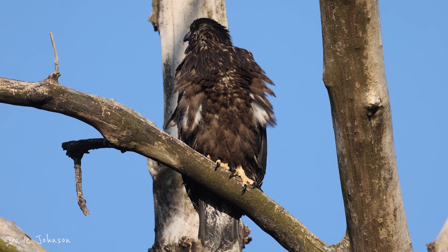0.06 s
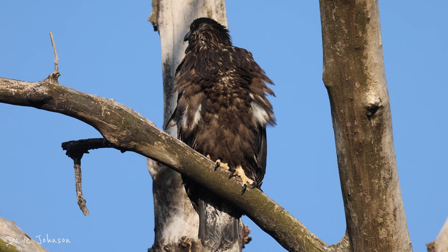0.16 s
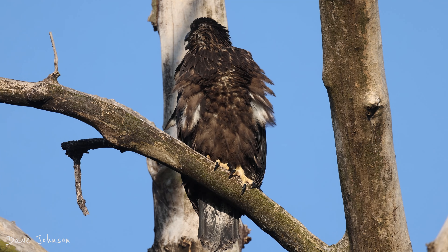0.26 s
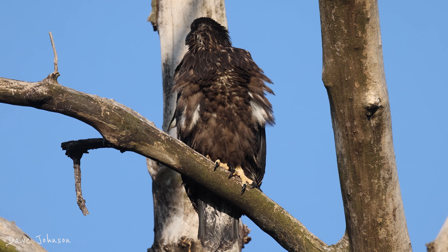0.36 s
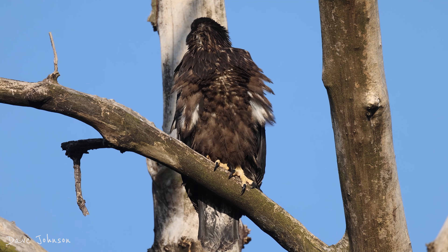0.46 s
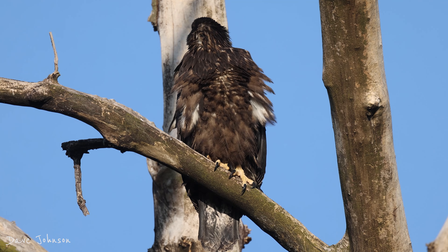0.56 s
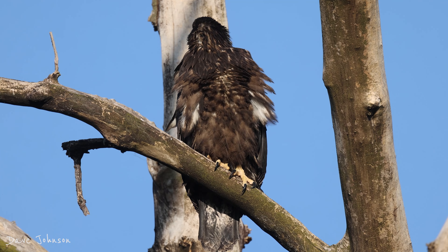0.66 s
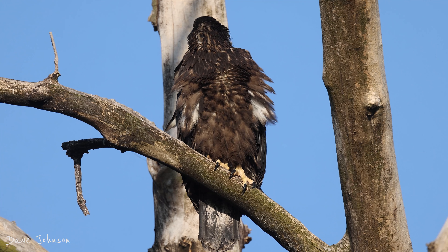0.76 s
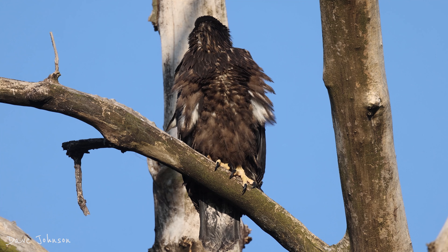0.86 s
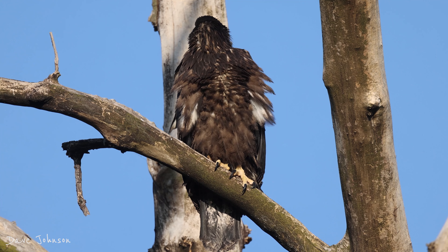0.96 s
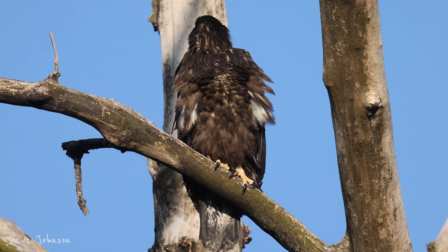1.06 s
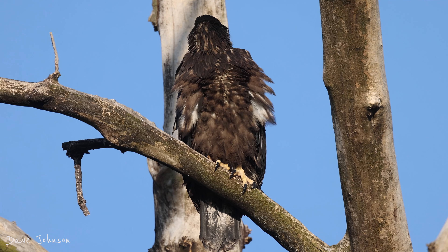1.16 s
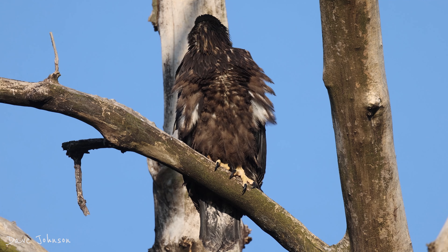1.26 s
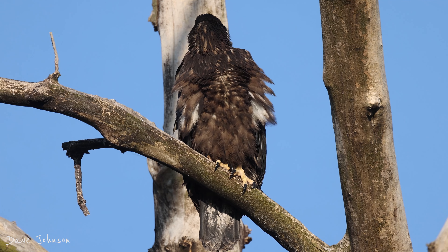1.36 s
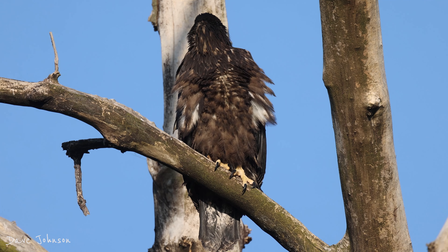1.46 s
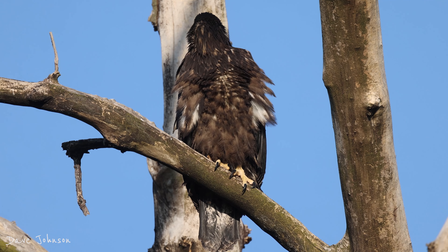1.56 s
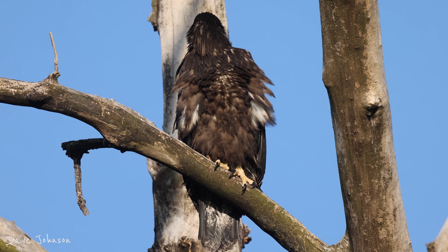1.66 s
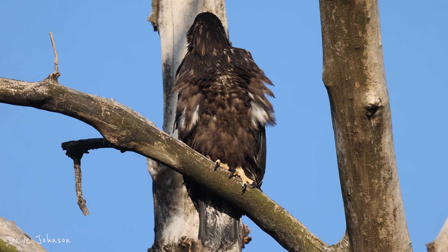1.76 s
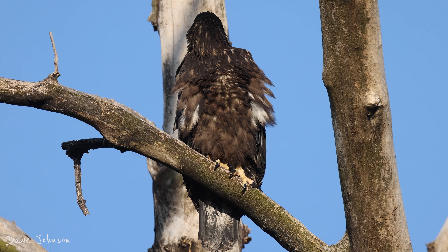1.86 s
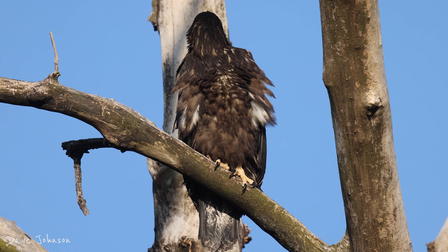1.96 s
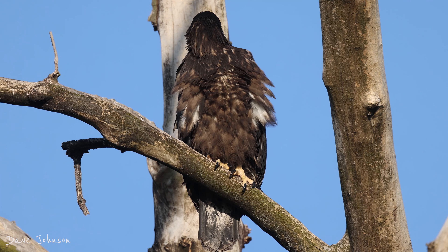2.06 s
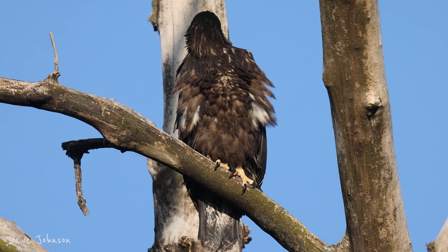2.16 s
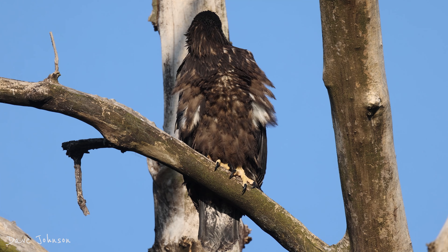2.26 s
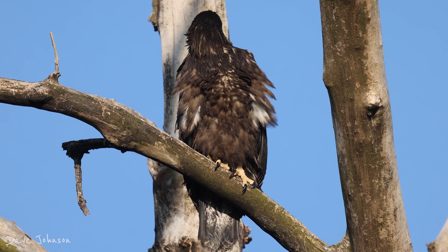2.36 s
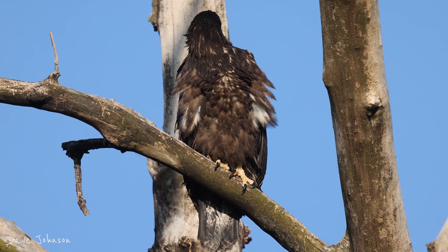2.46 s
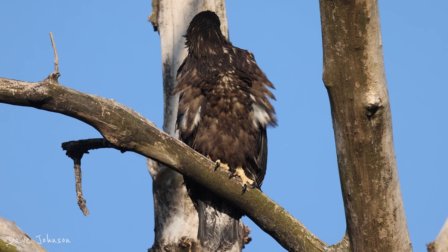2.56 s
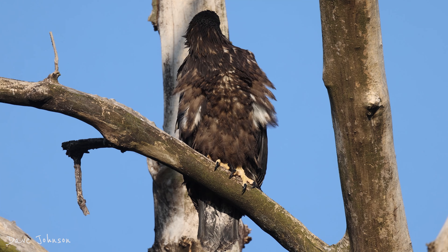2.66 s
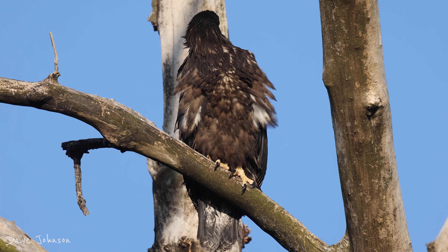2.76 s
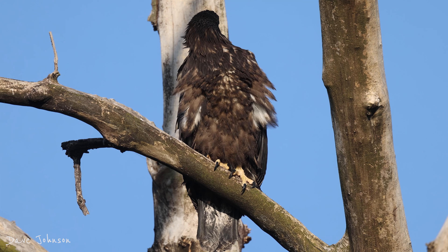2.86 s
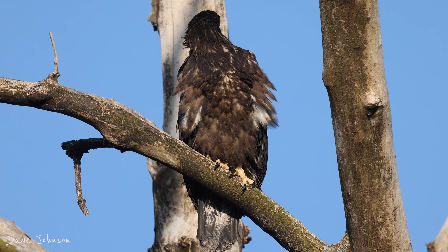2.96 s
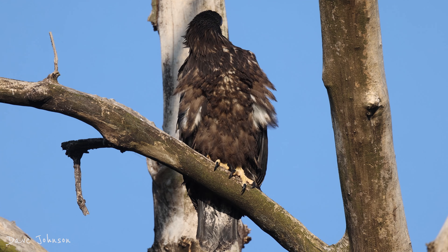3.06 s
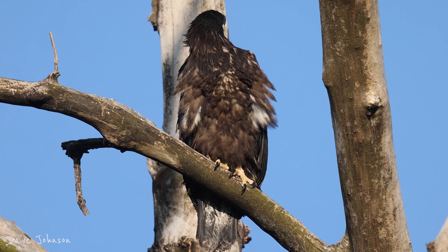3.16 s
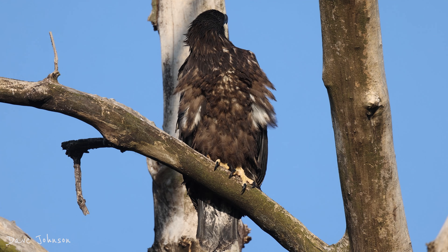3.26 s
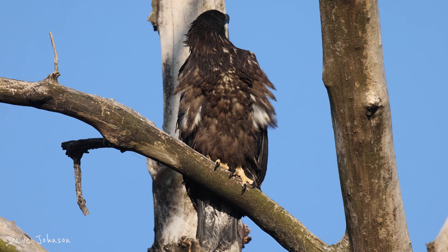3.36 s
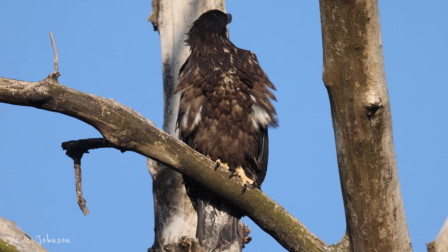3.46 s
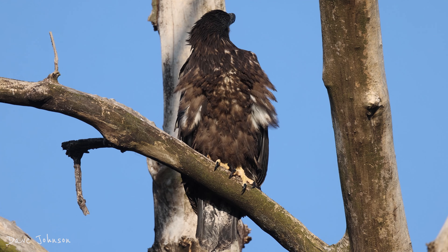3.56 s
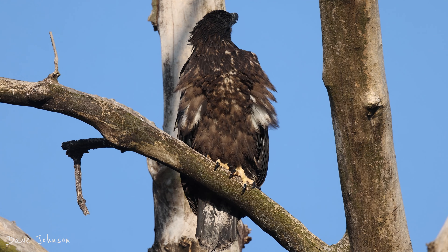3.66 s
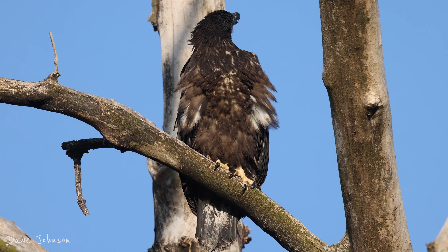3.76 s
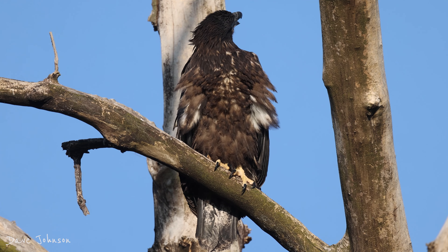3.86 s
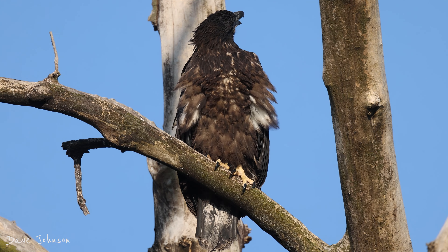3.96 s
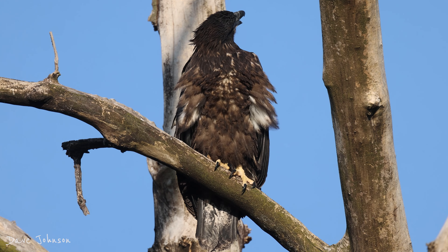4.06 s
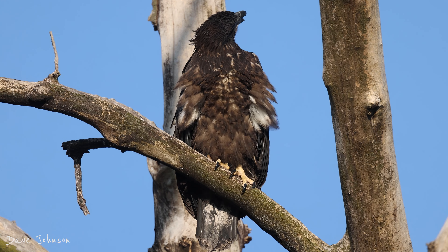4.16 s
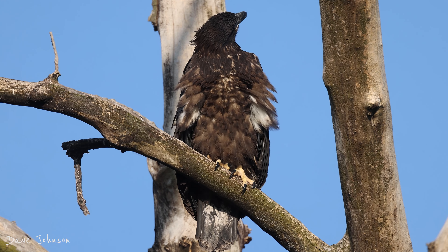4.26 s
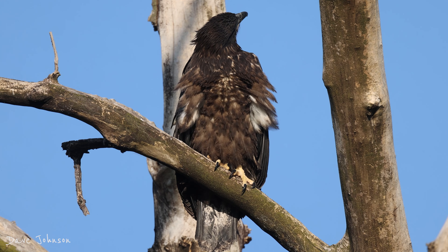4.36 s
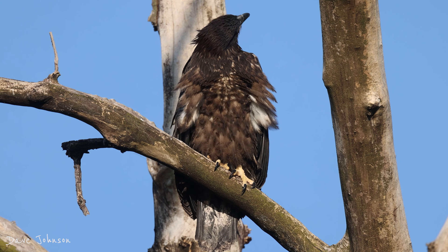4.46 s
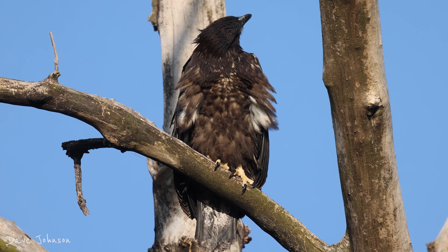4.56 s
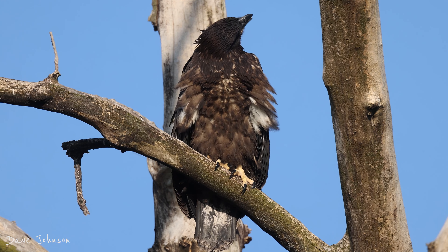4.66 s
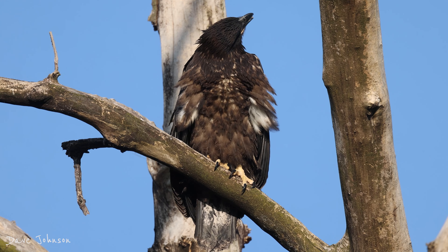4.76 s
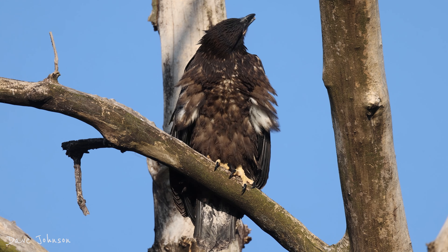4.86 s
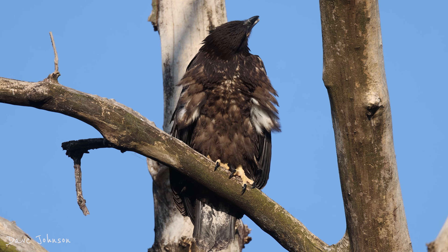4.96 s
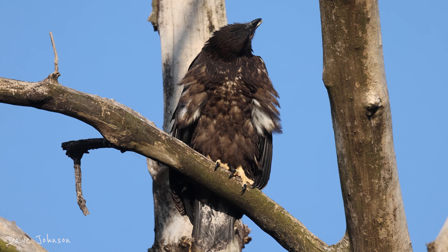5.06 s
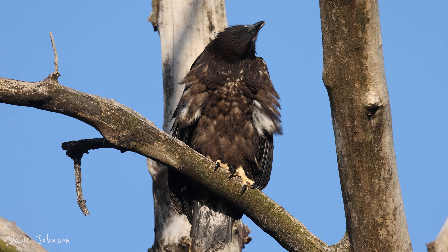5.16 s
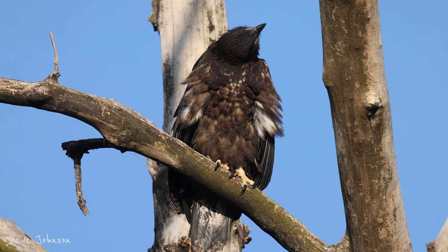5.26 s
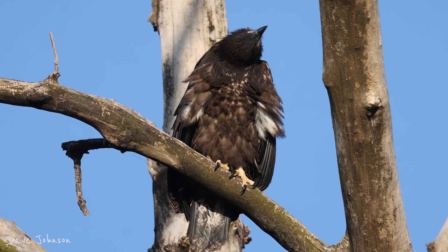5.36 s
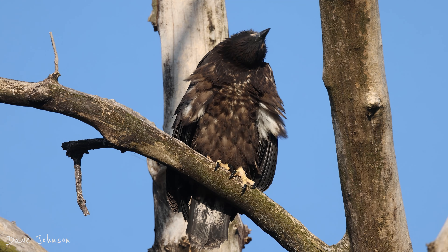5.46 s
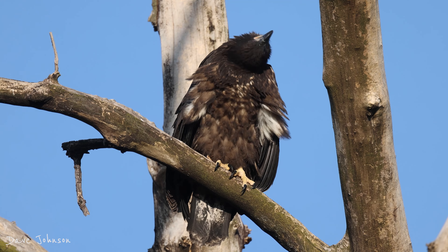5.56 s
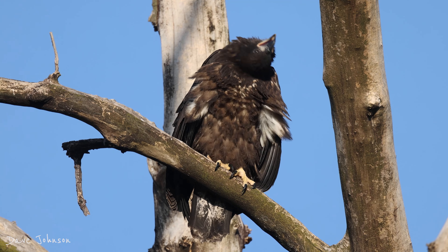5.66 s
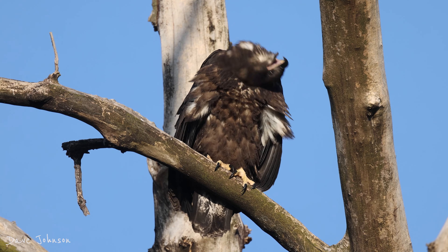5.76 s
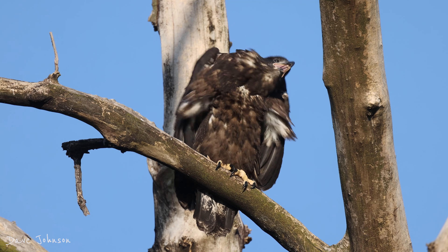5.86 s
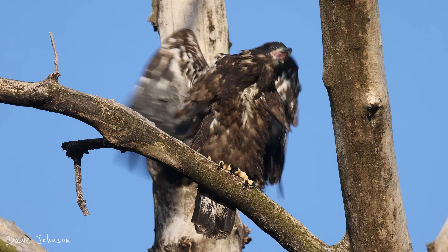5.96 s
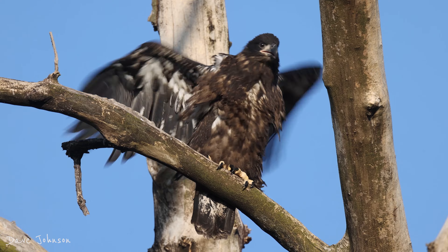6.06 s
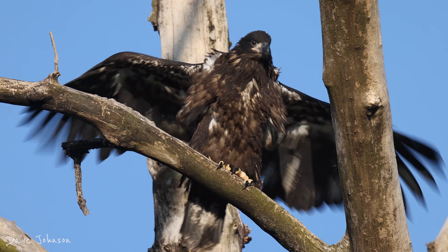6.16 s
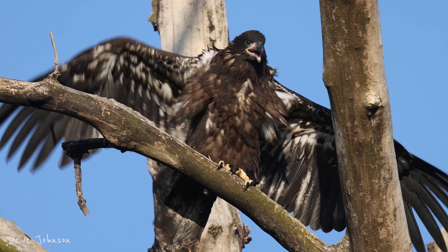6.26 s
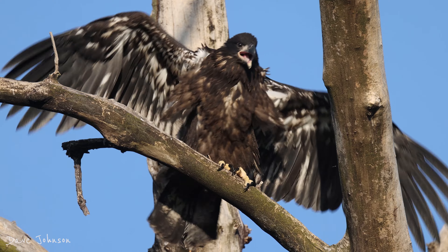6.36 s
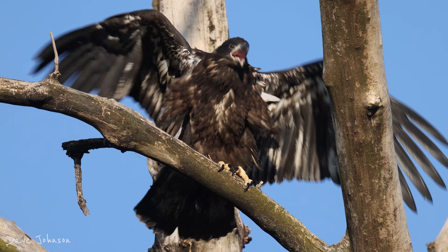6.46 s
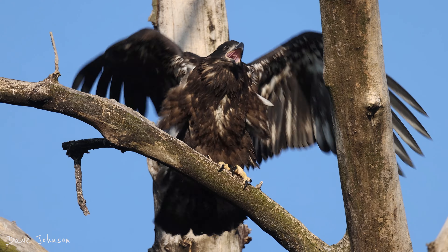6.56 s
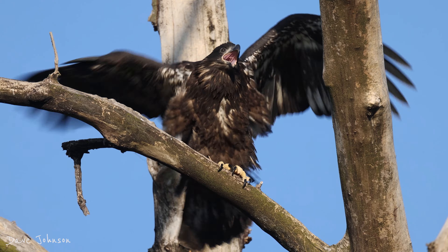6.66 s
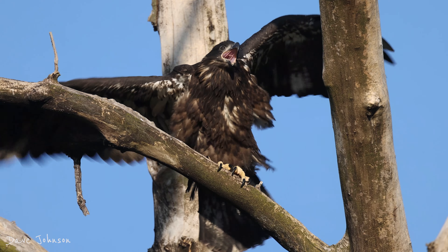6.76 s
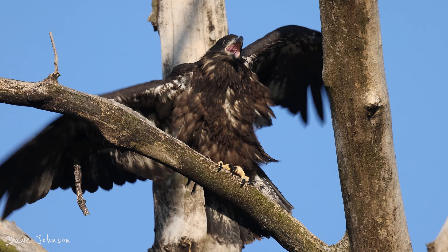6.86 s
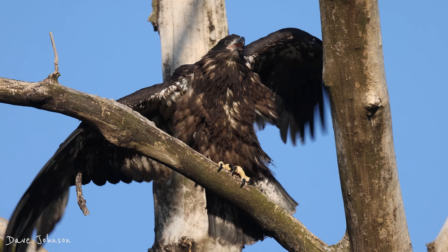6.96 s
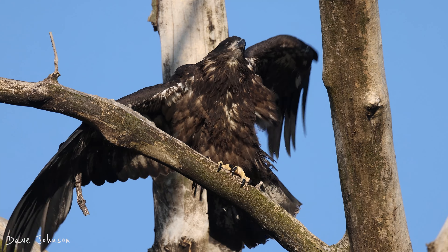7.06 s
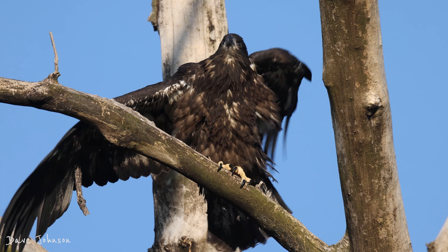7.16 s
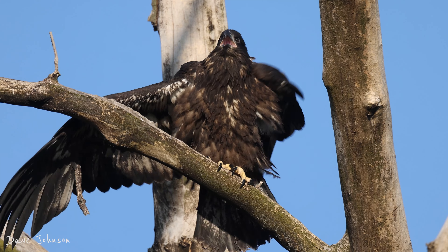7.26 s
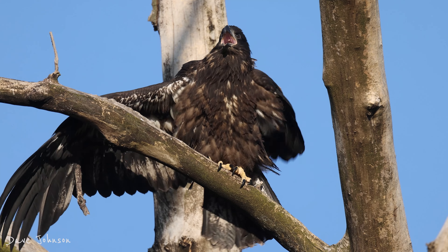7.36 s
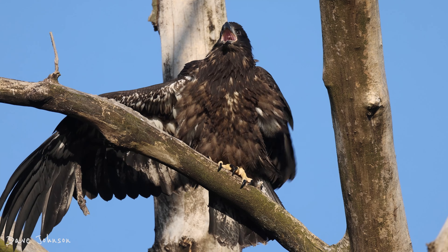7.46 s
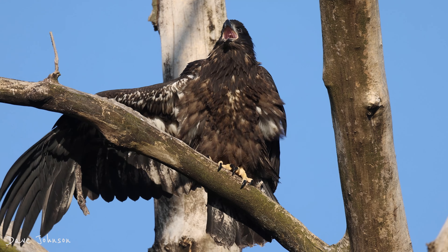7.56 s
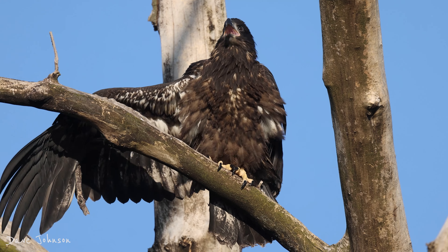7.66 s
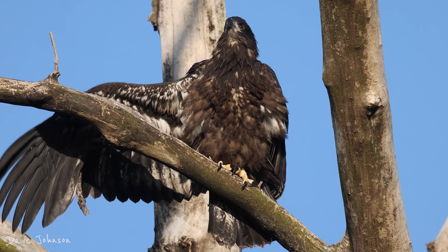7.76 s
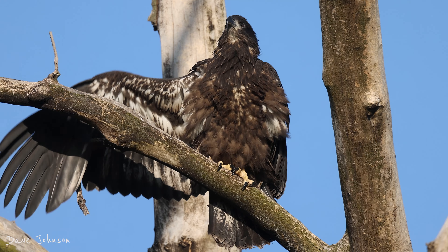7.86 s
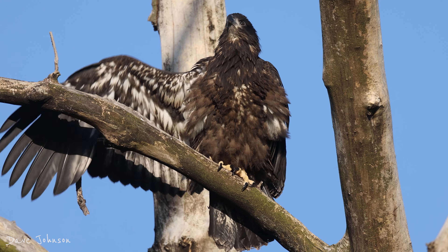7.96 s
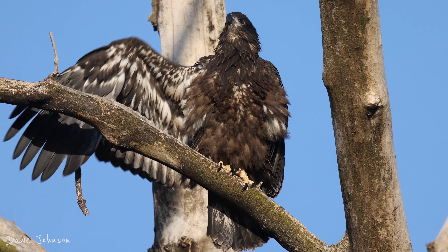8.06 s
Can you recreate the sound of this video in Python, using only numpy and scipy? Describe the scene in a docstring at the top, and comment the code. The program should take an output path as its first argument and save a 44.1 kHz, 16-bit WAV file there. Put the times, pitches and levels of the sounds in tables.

```python
"""A young eagle in a bare tree whistles five rising calls, later ones hoarse and with two voices at once:
two near-sine voices, their mixing tones, rasp strands and hiss. A blackbird chucks close by in clicks,
snaps, buzzes and squeaks. Low clucks are damped partials; far songbirds are gliding sines and throbbing
noise bands. Echoes off the trunks, blurred birdsong, air, wind and a distant hum (shaped noise) lie under it."""
import sys
import numpy as np
from scipy import signal
from scipy.io import wavfile
from scipy.ndimage import uniform_filter1d

SR = 44100
rng = np.random.default_rng(int(sys.argv[2]) if len(sys.argv) > 2 else 0)


def pcm_store(signal):
    """Save signal as 16-bit PCM."""
    levels = np.round(np.clip(np.atleast_2d(signal), -1, 1) * 32767)
    wavfile.write(sys.argv[1], SR, levels.astype(np.int16).T)


N = 357651

# eagle's first voice, one table per stretch between pitch jumps: (time [s], pitch [Hz], level [dB])
FIRST_VOICE = [
    [(3.9, 3280, -61), (4.03, 3294, -48), (4.06, 3340, -37.5), (4.124, 3420, -38.5)],
    [(4.126, 3900, -40.5), (4.22, 3700, -45), (4.27, 3776, -29), (4.36, 3794, -32.5)],
    [(4.82, 2790, -40), (4.85, 2595, -34.5), (4.914, 2727, -32)],
    [(4.916, 3190, -39), (4.97, 3162, -31), (5.038, 3182, -23.5), (5.1, 3203, -26), (5.13, 3243, -28.5),
     (5.19, 3310, -21), (5.21, 3340, -20), (5.218, 3460, -22), (5.254, 3537, -27), (5.278, 3627, -24.5),
     (5.298, 3601, -27), (5.32, 3724, -22), (5.346, 3716, -22)],
    [(5.803, 2790, -25), (5.848, 2822, -26), (5.865, 2880, -23.5), (5.872, 2950, -25.5), (5.889, 2975, -27)],
    [(5.891, 3330, -22.5), (5.964, 3475, -25), (6, 3580, -25.5), (6.018, 3770, -24.5), (6.04, 3740, -26),
     (6.108, 3830, -25.5), (6.156, 3610, -19.5), (6.19, 3560, -17.5)],
    [(6.462, 2930, -31), (6.484, 2941, -23), (6.55, 2997, -22), (6.6, 3170, -32), (6.66, 3520, -34.5),
     (6.716, 3850, -31), (6.735, 3780, -30), (6.76, 3860, -31.5), (6.83, 3740, -32), (6.86, 3770, -28.5),
     (6.9, 4015, -32), (6.95, 4000, -34.5), (7.012, 4120, -24), (7.035, 3910, -23), (7.098, 3990, -29)],
    [(7.43, 2970, -48), (7.45, 2990, -30), (7.505, 3090, -26.5), (7.515, 3400, -30.5), (7.62, 3530, -35.5),
     (7.72, 3594, -42), (7.79, 3700, -45), (7.855, 3750, -37)],
]
# eagle's second voice, other side of the syrinx: (time [s], pitch [Hz], level [dB])
SECOND_VOICE = [
    [(3.8, 3850, -66), (3.95, 3960, -51.5), (4.12, 3980, -62.5)],
    [(6.61, 4240, -45), (6.72, 4750, -45), (6.8, 4565, -46), (6.86, 4380, -34), (6.886, 4730, -38),
     (6.95, 4830, -36), (7.008, 5126, -34), (7.035, 4930, -39), (7.098, 4850, -34), (7.125, 3705, -49)],
    [(7.52, 3970, -40), (7.56, 4366, -38), (7.636, 4370, -36), (7.67, 4559, -40), (7.79, 4595, -35),
     (7.83, 4670, -41), (7.866, 4330, -40), (7.89, 3590, -51)],
]
# call endings: (end of held part [s], closing fall [s], pitch share fallen to [1], octave re tone [dB])
CALL_ENDS = [(4.359, 0.043, 0.58, -29), (5.345, 0.045, 0.79, -23.5), (6.19, 0.038, 0.74, -13),
             (7.098, .03, .65, -19), (7.855, 0.043, 0.75, -20.5)]
# hoarseness: (time [s], rasp [0-1])
RASP = [(4, .5), (4.24, .6), (4.28, .08), (5.19, .04), (5.3, .12), (5.4, .2), (5.8, .3), (5.9, .05),
        (6.05, .1), (6.2, .25), (6.55, .05), (6.59, .8), (6.8, .6), (6.85, .15), (6.9, .8), (6.97, .8),
        (6.99, .12), (7.49, .1), (7.52, .6), (7.7, .7), (7.8, .85)]
# brief dips of the first voice: (time [s], depth [dB])
CATCHES = [(5.11, -10), (5.14, -4), (5.182, -5)]
RASP_HZ = 290.4  # mean offset of the side strands from the tone
OCTAVE_DB_PER_KHZ = -19.5  # above 3 kHz
OCTAVE_GROWTH = 0.4  # extra octave dB per dB of voice re -25 dB
FALL_MIDDLE_DB, FALL_END_DB = 2.5, -3  # re the last held level
FALL_EARLY = 0.42  # share of the pitch drop done at half time

# blackbird chucks: (time [s], level [dB], squeak level [dB], squeak delay [ms], snap re level [dB])
CHUCKS = [(1.2573, -47, -38, 20, 6), (2.83, -40, -27, 24, 0), (3.0852, -39.5, -48, 23, 0),
          (3.246, -31.5, -22.5, 27, -2.5), (3.504, -32.5, -28.5, 36, -0.5),
          (3.724, -32.5, -27.5, 23.4, -4.5), (4.077, -30, -27.5, 28, -0.5), (4.3146, -33, -26, 27, 0),
          (4.6547, -28.5, -24.5, 24, 0), (4.893, -31.5, -23, 25.5, 0), (5.5009, -29, -29, 31.7, -2),
          (6.0501, -27.5, -18.5, 19.6, 3), (6.3416, -25.5, -26.5, 38, -0.5), (7.471, -21.5, -13, 24.5, -8),
          (8.0766, -28.5, -19.5, 28.6, 0)]
# ringing of a click: (frequency [Hz], level [dB])
CLICK_RING = [(1600, 0), (2500, -1), (3600, -5), (6000, -16)]
# mean snap glide: (time in chuck [ms], pitch [Hz])
SNAP_GLIDE = [(13, 3400), (17, 3650), (23, 5000), (32, 5500)]
CLICK_DB, BUZZ_DB = 1, -2.5  # re the chuck's level
SNAP_START_MS, SNAP_RISE_MS = 11.6, 1.4
SNAP_DROP_AFTER_MS, SNAP_DROP_DB, SNAP_FADE_DB_PER_MS = 10, -10, -0.6984  # counted from the snap's start

# low clucks: (time [s], level [dB], pitch [Hz])
CLUCKS = [(1.3298, -43.5, 1670), (1.352, -48, 1486), (5.8581, -45, 1440), (5.0288, -42.5, 1300),
          (5.203, -46.5, 1430), (5.235, -43.5, 1676), (5.2471, -45, 1560), (5.261, -42.5, 1400),
          (5.3188, -45, 1493), (5.8067, -41.5, 1400), (5.8416, -41.5, 1456), (6.4418, -47, 1535),
          (6.54, -36, 1440), (6.7196, -46.5, 1456), (6.888, -43.5, 1607), (6.9523, -51, 1455),
          (7.121, -44.5, 1456), (7.6946, -44, 1367), (7.7979, -45.5, 1335)]
# cluck partials: (factor on pitch [1], level re cluck [dB])
CLUCK_PARTIALS = [(1, 17), (1.4, 10.5), (1.9, 12)]
# short pure pips: (time [s], length [s], pitch [Hz], level [dB], octave level [dB])
PIPS = [(6.549, 0.013, 2513, -11, -26), (6.566, 0.0061, 4010, -20.5, -56), (5.212, .006, 3780, -27, -56),
        (5.393, 0.01, 6800, -37, -70)]
CLUCK_RISE_S, CLUCK_T60_S, CLUCK_TICK_DB = 0.0018, 0.043, 1.5

# far whistled notes, and at 7.105 s a short echo of the eagle's fourth call: (time [s], length [s], # start
# [Hz], middle [Hz], end [Hz], level [dB])
NOTES = [(0.001, 0.11, 2810, 3056, 3220, -44), (0.094, 0.17, 3190, 3320, 3180, -48),
         (0.087, 0.19, 3900, 4040, 4100, -49), (0.257, 0.061, 1310, 1304, 1380, -48.5),
         (0.3, 0.11, 3980, 4080, 4445, -44.5), (0.36, 0.0262, 1584, 1290, 1050, -42.5),
         (0.373, 0.144, 4200, 4220, 4160, -46.5), (0.329, 0.043, 5300, 5500, 5370, -52.5),
         (1.677, 0.014, 5470, 5300, 4700, -47), (0.533, 0.116, 3050, 3130, 3230, -60),
         (0.452, 0.02, 3300, 2990, 2370, -40.5), (1.155, 0.048, 2700, 3430, 3660, -50),
         (1.219, 0.03, 4180, 4680, 5700, -46), (1.24, 0.04, 4400, 3400, 3200, -44.5),
         (1.364, 0.019, 4100, 4400, 3400, -45), (1.695, 0.027, 4800, 5620, 3870, -41.5),
         (1.871, 0.071, 5870, 5760, 5200, -55), (1.785, 0.33, 2720, 2810, 2665, -55.5),
         (3.57, .14, 3520, 3260, 3170, -57), (7.161, 0.1, 4760, 5120, 5080, -53),
         (2.713, 0.052, 2140, 2294, 2220, -38.5), (3.685, 0.053, 2660, 2620, 2310, -48),
         (4.182, 0.02, 4450, 4250, 4160, -38.5), (4.766, 0.019, 3800, 4130, 4080, -40.5),
         (6.004, 0.041, 4260, 4750, 4260, -42), (6.271, 0.034, 2950, 3830, 3450, -39.5),
         (6.472, 0.037, 3010, 3940, 3530, -43), (6.83, 0.16, 1620, 1590, 1692, -46),
         (7.105, 0.062, 3880, 3950, 3900, -43), (7.228, 0.062, 3480, 3435, 3430, -43.5),
         (7.408, 0.025, 1695, 1930, 2140, -44), (7.855, 0.02, 1244, 1384, 910, -40.5),
         (7.95, 0.059, 2500, 2790, 3040, -44.5), (8, 0.027, 2950, 3160, 2970, -38.5)]
# even songs: (first [s], gap [s], repeats [1])
SONG_TIMES = [(.748, .08, 5), (1.34, .096, 4), (2.405, .124, 4)]
# syllable of each song: (first level [dB], step per repeat [dB], strokes), with strokes as
# (delay [s], length [s], start [Hz], middle [Hz], end [Hz], level re syllable [dB])
SYLLABLES = [(-45.5, 0.5, [(0, 0.0148, 5280, 4370, 3900, -2.5), (.019, 0.022, 4490, 4770, 6440, -6.5)]),
             (-49.5, 2.5, [(0.00095, 0.017, 4900, 5230, 5360, -0.5)]),
             (-46.5, -0.5, [(0.0016, 0.0186, 5150, 4950, 4400, -3), (.03, 0.02, 5400, 4400, 3550, 2),
             (0, 0.015, 3400, 6000, 6000, -7)])]
# buzzy notes and trills: (time [s], length [s], centre [Hz], pole width [Hz], throbs [1/s], base level [dB])
BUZZES = [(.43, .2, 1850, 500, 25, -51), (.19, .08, 5800, 1500, 12, -51),
          (1.265, .035, 4200, 1200, 28, -41), (1.31, .07, 2000, 1300, 85, -49),
          (3.1, .05, 4600, 1500, 60, -44), (4.7, .04, 4500, 2500, 80, -40), (5.27, .46, 2690, 160, 40, -47),
          (7.24, .19, 2800, 250, 37, -44)]
TWITTER_PER_S, TWITTER_MAX_DB = 22, -55  # mean rate; loudest base level

# echo among the trunks: (frequency [Hz], t60 [s])
ECHO_T60 = [(1000, 0.27), (3000, 0.19), (6000, 0.048), (10000, 0.28)]
# blurred birdsong deep in the wood: (time [s], level [dB])
CHORUS_LEVEL = [(0, -45), (.55, -46.5), (.75, -53.5), (1.4, -48), (2.3, -51), (3.2, -47), (3.7, -51.5),
                (4.55, -49.5), (5.45, -45), (5.75, -44), (6.3, -42), (7.2, -41.5), (7.4, -44),
                (8.11, -44.5)]
# its spectrum: (frequency [Hz], relative density [dB/Hz])
CHORUS_COLOUR = [(1200, 7.5), (1700, 7), (2600, 9), (3600, 10), (4600, 0), (5300, -6.5), (7000, -5.5)]
# wind: (time [s], level [dB])
WIND_LEVEL = [(0, -48.5), (.75, -44), (1.4, -51), (2.4, -44), (3.5, -53), (5.2, -48.5), (5.75, -40.5),
              (6.1, -46.5), (6.5, -37), (7.7, -49.5)]
# its spectrum: (frequency [Hz], relative density [dB/Hz])
WIND_COLOUR = [(12, 7.5), (26, -0.5), (40, -16), (62, -9.0)]
# far traffic-like rumble: (frequency [Hz], relative density [dB/Hz])
RUMBLE_COLOUR = [(32, -29), (55, -6.5), (92, 0), (146, -20), (182, -14), (301, -20), (386, -24.5),
                 (661, -29.5)]
# wavering lines in the rumble: (frequency [Hz], pole width [Hz], level [dB])
HUM_LINES = [(102.05, 6.2, -59), (144.1, 8.1, -60.5), (383, 3.1, -74.5)]
# air: (frequency [Hz], relative density [dB/Hz])
AIR_COLOUR = [(430, -110), (730, -6.5), (921, 8), (1410, -3.5), (2690, -16), (5070, -10), (15000, -14),
              (16000, -17)]
# hiss, opposite in the two channels: (frequency [Hz], relative density [dB/Hz])
HISS_COLOUR = [(12, -28), (20, 17), (91, -6.5), (270, -27), (825, -27.5), (2910, -33), (7950, -9.5),
               (16000, -13.5)]
RUMBLE_DB, AIR_DB, HISS_DB = -55.5, -51.5, -62
EDGE_HZ = 15800


def gain_of(db):
    """Decibels to gain."""
    return 10 ** (np.asarray(db) / 20)


def evened(x):
    """Scales to rms 1."""
    return x / np.sqrt(np.mean(x ** 2) + 1e-20)


def over_time(rows, column):
    """One column of a curve at every sample, held level beyond its ends."""
    rows = np.asarray(rows)
    return np.interp(np.arange(N) / SR, rows[:, 0], rows[:, column])


def add(mix, s, sound):
    """Mixes a sound in at s seconds."""
    part = mix[max(round(s * SR), 0):][:len(sound)]
    part += sound[:len(part)]


def sine(hz):
    """Sine of peak 1 that follows a pitch curve."""
    return np.sin(2 * np.pi * np.cumsum(hz) / SR)


def wander(size, hz):
    """Smooth chance of rms 1: white noise averaged twice over 1/hz seconds."""
    span = max(int(SR / hz), 1)
    once = uniform_filter1d(rng.standard_normal(size), span)
    return evened(uniform_filter1d(once, span))


def resonate(x, hz, width):
    """Band-pass round a moving centre: shift down to zero, two one-pole low-passes, shift back."""
    turn = np.exp(2j * np.pi * np.cumsum(hz * np.ones(len(x))) / SR)
    r = np.exp(-np.pi * width / SR)
    low = x / turn
    for _ in range(2):
        low = signal.lfilter([1 - r], [1, -r], low)
    return 2 * (turn * low).real


def noise_band(size, hz, width):
    """White noise through the moving band-pass, rms 1."""
    return evened(resonate(rng.standard_normal(size), hz, width))


def noise(colour, patchy_db, size=1024):
    """Random short-time spectra of a given colour, with drifting patches; rms 1."""
    frames, hz = 4 * N // size + 5, np.fft.rfftfreq(size, 1 / SR)
    a, b, patches = rng.standard_normal((frames, len(hz), 3)).T
    patches = uniform_filter1d(patches, 8, 0)  # over frequency
    patches = evened(uniform_filter1d(patches, 10, 1))  # over time
    f, db = np.transpose(colour)
    shape_db = np.interp(np.log(hz + 1), np.log(f + 1), db, left=-100, right=-100)
    spectra = (a + 1j * b) * gain_of(shape_db[:, None] + patchy_db * patches)
    return evened(signal.istft(spectra, nperseg=size, noverlap=3 * size // 4)[1][:N])


def eagle():
    """Two near-sine voices that mix into sum and difference tones; rasp frays them into side strands and hiss."""
    low_phase, hz, low_gain = whistle(FIRST_VOICE, flutter=0.00207)
    high_phase, high_hz, high_gain = whistle(SECOND_VOICE, flutter=0.0027)
    rasp, t = over_time(RASP, 1), np.arange(N) / SR
    catch_db = sum(db * np.exp(-((t - s) / 0.0038) ** 2) for s, db in CATCHES)
    low_gain = low_gain * gain_of(catch_db)
    octave = low_gain * gain_of(octave_per_call() + OCTAVE_DB_PER_KHZ * np.maximum(hz / 1000 - 3, 0))
    octave = octave * (low_gain / gain_of(-25)) ** OCTAVE_GROWTH
    low, high = np.exp(1j * low_phase), np.exp(1j * high_phase)
    between = np.exp(0.5j * (low_phase + high_phase))

    # an unsteady flapping splits strands off either side of the tone
    flap = np.exp(2j * np.pi * np.cumsum(RASP_HZ * (1 + 0.25 * wander(N, 40))) / SR)
    low_fray, high_fray = frayed(rasp, flap), frayed(0.45 * rasp, flap)
    tones = low_gain * low * low_fray + octave * (low * low_fray) ** 2 + high_gain * high * high_fray

    # mixing tones sound only where both voices do
    ragged = wander(N, 60) + 1j * wander(N, 50)
    loose = wander(N, 70) + 1j * wander(N, 80)
    mixed = gain_of(-12) * low ** 2 / high * high_fray
    mixed = mixed + gain_of(-24) * high ** 2 / low
    mixed = mixed + gain_of(-7) * rasp ** 2 * between * ragged
    mixed = mixed + gain_of(-9) * rasp ** 2 * low ** 2 / between * loose  # half the gap below the first voice
    mixed = mixed + gain_of(-21.5) * low * high * low_fray
    throat = high_hz < 4760  # the throat passes little of the next tone above this
    mixed = mixed + gain_of(-19) * high ** 2 * low_fray * (1 + 0.5 * ragged) * throat
    voiced = tones + np.sqrt(low_gain * high_gain) * mixed

    tremble = gain_of(0.7 * wander(N, 90) + 1.0 * wander(N, 40))
    centre = np.where(hz > 0, hz, 3000)
    hiss = noise_band(N, 0.91 * centre, 1900) + gain_of(-15.5) * noise_band(N, 1.87 * centre, 2800)
    loudness = uniform_filter1d(low_gain + high_gain, 900)
    hiss = hiss * rasp * loudness * gain_of(-5 + 3 * wander(N, 60))
    return np.sqrt(2) * tremble * voiced.real + hiss


def whistle(tables, flutter):
    """Running phase, pitch and gain of one voice; pitch bends round corners, ends are soft."""
    hz, gain = np.zeros(N), np.zeros(N)
    for rows in map(closed, tables):
        a, b = round(rows[0][0] * SR), round(rows[-1][0] * SR)
        hz[a:b] = uniform_filter1d(over_time(rows, 1)[a:b], 220, mode="nearest")
        to_end = np.minimum(np.arange(b - a), np.arange(b - a)[::-1])
        gain[a:b] = gain_of(over_time(rows, 2)[a:b]) * np.minimum(to_end / (0.0016 * SR), 1)
    unsteady_hz = hz * (1 + flutter * wander(N, 119.0) + 0.00338 * wander(N, 50.4))
    return 2 * np.pi * np.cumsum(unsteady_hz) / SR, hz, gain


def closed(rows):
    """Adds the closing fall to a stretch that ends a call."""
    s, hz, db = rows[-1]
    for end, fall, share, *_ in CALL_ENDS:
        if abs(end - s) < 0.035:
            middle = (s + fall / 2, hz * (1 - FALL_EARLY * (1 - share)), db + FALL_MIDDLE_DB)
            return rows + [middle, (s + fall, hz * share, db + FALL_END_DB)]
    return rows


def octave_per_call():
    """Base octave level in dB, held through each call."""
    ends, *_, octave_db = np.transpose(CALL_ENDS)
    call = np.searchsorted(ends + 0.1, np.arange(N) / SR)
    return octave_db[np.minimum(call, len(ends) - 1)]


def frayed(rasp, flap):
    """Complex modulator that trades steady tone for chance sidebands as rasp grows."""
    sides = wander(N, 110) * flap + wander(N, 110) / flap
    strands = (sides + 1j * wander(N, 400) + wander(N, 400)) / 2
    return np.sqrt(1 - rasp ** 2) + rasp * strands


def chucks():
    """Blackbird: two dry clicks, a low noise buzz under a ragged upward snap, then a squeak."""
    out, ms = np.zeros(N), np.arange(round(0.07 * SR)) / SR * 1000
    ring = sum(gain_of(db) * np.sin(2 * np.pi * hz * ms / 1000) for hz, db in CLICK_RING)
    click = ring * gain_of(-60 * ms / 11)
    since = ms - SNAP_START_MS
    rise_db = 30 * np.clip(since / SNAP_RISE_MS - 1, -3, 0)
    fade_db = SNAP_DROP_DB + SNAP_FADE_DB_PER_MS * (since - SNAP_DROP_AFTER_MS)
    shape_db = np.where(since < SNAP_DROP_AFTER_MS, rise_db, fade_db)
    for s, db, squeak_db, delay_ms, snap_db in CHUCKS:
        add(out, s, gain_of(db + CLICK_DB) * click)
        add(out, s + 0.009, gain_of(db + CLICK_DB - 4) * click)

        snap_hz = np.interp(ms, *np.transpose(SNAP_GLIDE)) * (1 + 0.02 * wander(len(ms), 300))
        snap = sine(snap_hz) + gain_of(-26.0) * sine(2 * snap_hz)
        snap = snap + 0.65 * noise_band(len(ms), snap_hz, 2500)
        ragged_db = shape_db + np.clip(3 * wander(len(ms), 250), -9, 4)

        after = ms - delay_ms
        squeak_hz = (4500 - 25 * np.clip(after, -9, 9)) * (1 + 0.024 * wander(len(ms), 170))
        squeak = sine(squeak_hz) * np.exp(-(after / 3.75) ** 2)
        buzz = noise_band(len(ms), 1787, 560) * np.exp(-((ms - 17) / 4.7) ** 2)
        add(out, s, gain_of(db + snap_db + ragged_db) * snap)
        add(out, s, gain_of(squeak_db) * squeak + gain_of(db + BUZZ_DB) * buzz)
    return out


def clucks():
    """A few uneven partials with a tick of noise, quick to rise and die."""
    out, t = np.zeros(N), np.arange(round(0.03 * SR)) / SR
    shape = np.minimum(t / CLUCK_RISE_S, 1) * gain_of(-60 * t / CLUCK_T60_S)
    for s, db, hz in CLUCKS:
        partials = sum(gain_of(partial_db) * np.sin(2 * np.pi * (factor * hz * t + rng.random()))
                       for factor, partial_db in CLUCK_PARTIALS)
        tick = gain_of(CLUCK_TICK_DB) * noise_band(len(t), 1970, 1500)
        add(out, s, gain_of(db) * (partials + tick) * shape)
    return out


def pips():
    """A tone and its octave under a bell-shaped swell."""
    out = np.zeros(N)
    for s, length, hz, db, octave_db in PIPS:
        turns = hz * np.arange(round(length * SR)) / SR
        tone = gain_of(db) * np.sin(2 * np.pi * turns) + gain_of(octave_db) * np.sin(4 * np.pi * turns)
        add(out, s, np.sqrt(2) * tone * np.hanning(len(turns)))
    return out


def songbirds():
    """Single notes, even songs, and throbbing bands of noise."""
    out = np.zeros(N)
    for row in NOTES:
        note(out, *row)
    for (first, gap, repeats), (db, step_db, strokes) in zip(SONG_TIMES, SYLLABLES):
        for k in range(repeats):
            for delay, *shape, stroke_db in strokes:
                note(out, first + k * gap + delay, *shape, db + k * step_db + stroke_db)
    for s, length, hz, width, throbs, db in BUZZES:
        t = np.arange(round(length * SR)) / SR
        throb = (1.2 - np.cos(2 * np.pi * throbs * t)) * signal.windows.tukey(len(t), 0.5)
        add(out, s, gain_of(db) * noise_band(len(t), hz, width) * throb)
    return out


def note(out, s, length, start_hz, middle_hz, end_hz, db):
    """A slightly unsteady sine that glides through three pitches."""
    u = np.linspace(0, 1, round(length * SR))
    hz = np.polyval(np.polyfit([0, 0.5, 1], [start_hz, middle_hz, end_hz], 2), u)
    tone = sine(hz * (1 + 0.0045 * wander(len(u), 200)))
    level = gain_of(db + 3 * wander(len(u), 90)) * signal.windows.tukey(len(u), 0.4)
    add(out, s, np.sqrt(2) * level * tone)


def twitter():
    """Small birds: short faint slides up or down, at chance moments."""
    out = np.zeros(N)
    for when, long, pitch, slide, soft in rng.random((round(TWITTER_PER_S * N / SR), 5)):
        hz = 2600 * 2 ** pitch
        middle_hz, end_hz = hz * (0.9 + 0.2 * slide), hz * (0.8 + 0.4 * slide)
        note(out, when * N / SR, 0.015 + 0.05 * long, hz, middle_hz, end_hz, TWITTER_MAX_DB - 8 * soft)
    return out


def wood_echo(x):
    """Sparse echoes of random sign from the trunks, each band dying at its own t60."""
    taps = np.zeros(SR)
    at = np.arange(400, SR - 20, 20) + rng.integers(0, 20, (SR - 401) // 20)
    taps[at] = rng.choice([-1., 1.], len(at))
    hz, t, z = signal.stft(taps, SR, nperseg=256)
    t60 = np.interp(hz, *np.transpose(ECHO_T60))[:, None]
    tail = signal.istft(z * gain_of(-60 * t / t60), SR, nperseg=256)[1]
    return signal.fftconvolve(x, tail / np.linalg.norm(tail))[:N]


def chorus():
    """Birdsong blurred by distance into patchy noise."""
    return gain_of(over_time(CHORUS_LEVEL, 1)) * noise(CHORUS_COLOUR, patchy_db=2.5, size=512)


def wind():
    """Lumpy low noise that swells and sinks."""
    return gain_of(over_time(WIND_LEVEL, 1)) * noise(WIND_COLOUR, patchy_db=2, size=4096)


def rumble():
    """Patchy low noise with narrow noise bands as its hum."""
    hum = sum(gain_of(db) * noise_band(N, hz, width) for hz, width, db in HUM_LINES)
    return gain_of(RUMBLE_DB) * noise(RUMBLE_COLOUR, patchy_db=2.5, size=4096) + hum


def air():
    """Steady broad noise."""
    return gain_of(AIR_DB) * noise(AIR_COLOUR, patchy_db=0.04)


def scene():
    """Everything lies in the middle; only a faint hiss differs between the channels."""
    near, calls, far = eagle(), chucks() + clucks() + pips(), songbirds() + twitter()
    echo = wood_echo(gain_of(-15) * near + gain_of(-8) * calls + gain_of(1) * far)
    high_pass = signal.butter(8, 800, "high", fs=SR, output="sos")
    birds = signal.sosfilt(high_pass, near + calls + far + echo)
    middle = birds + chorus() + wind() + rumble() + air()
    side = gain_of(HISS_DB) * noise(HISS_COLOUR, patchy_db=1.0)
    return np.array([middle + side, middle - side])


def record(dry):
    """Low-pass band limit."""
    low_pass = signal.firwin(1023, EDGE_HZ, window=("kaiser", 9), fs=SR)
    return signal.oaconvolve(dry, low_pass[None], "same")


dry = scene()
out = record(dry)
pcm_store(out)
```